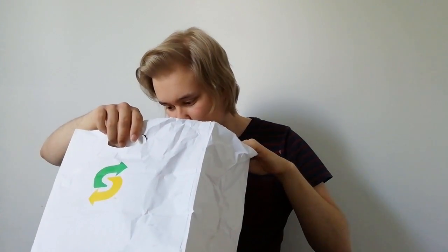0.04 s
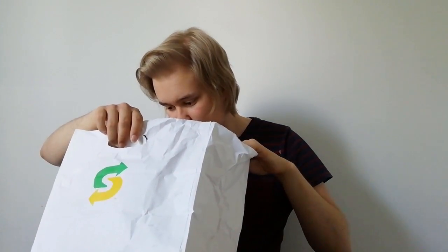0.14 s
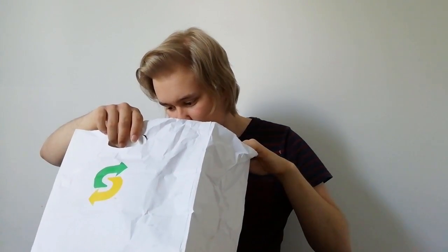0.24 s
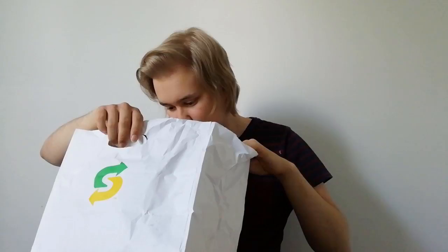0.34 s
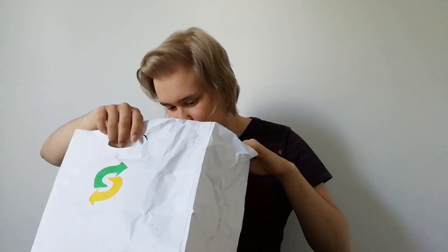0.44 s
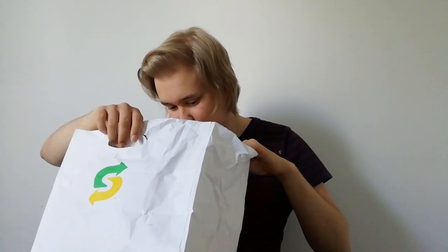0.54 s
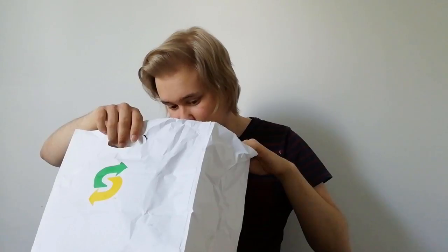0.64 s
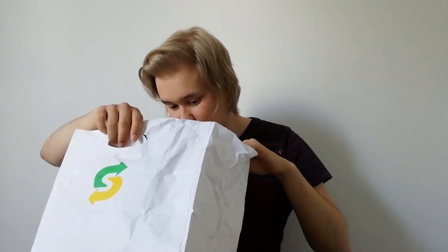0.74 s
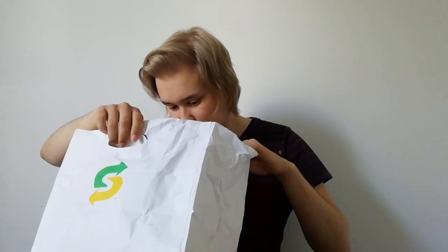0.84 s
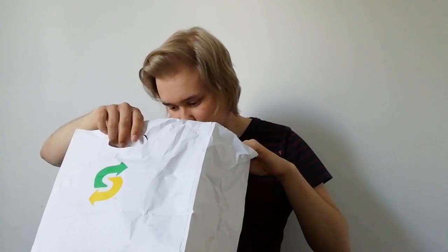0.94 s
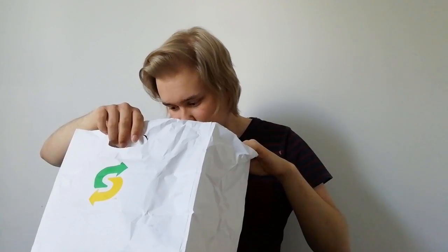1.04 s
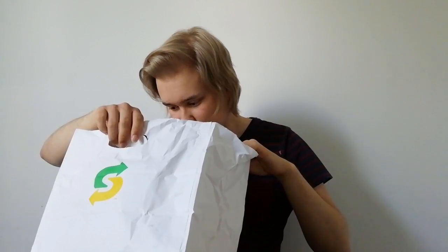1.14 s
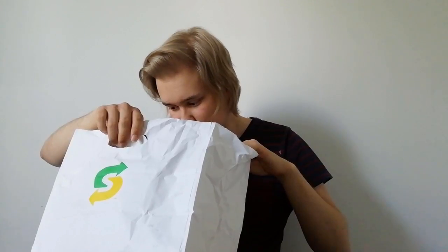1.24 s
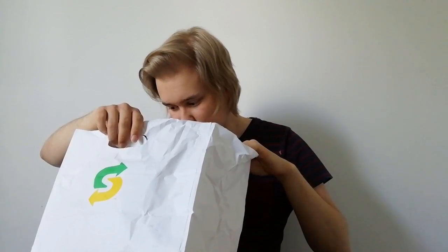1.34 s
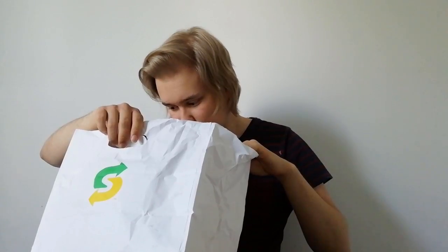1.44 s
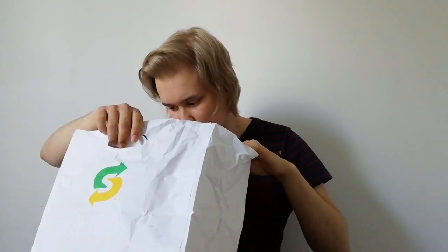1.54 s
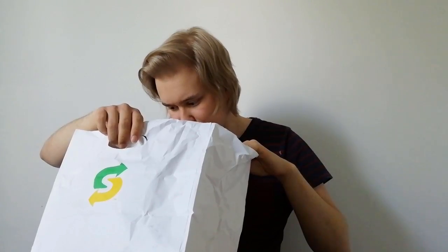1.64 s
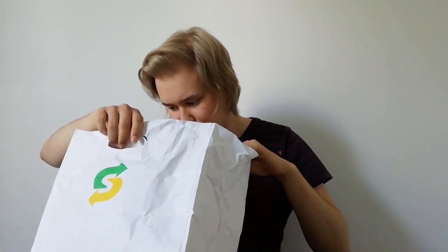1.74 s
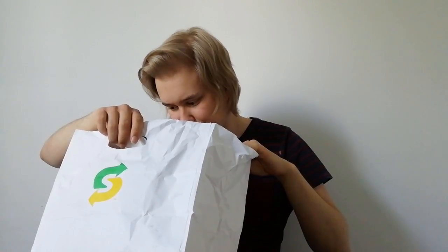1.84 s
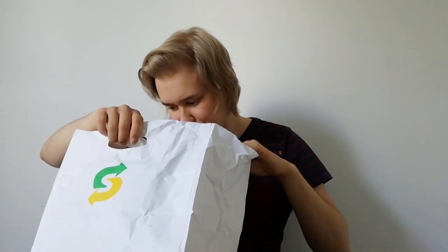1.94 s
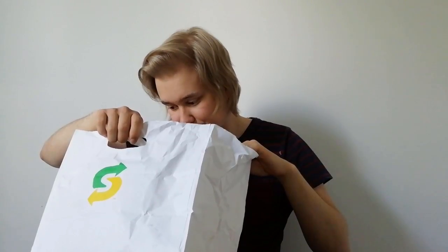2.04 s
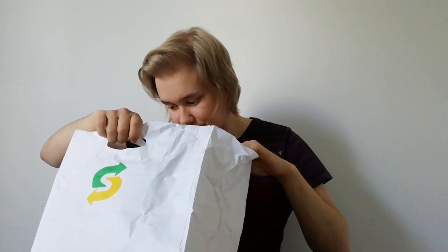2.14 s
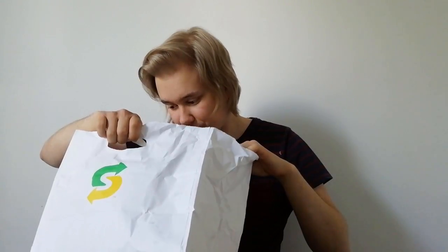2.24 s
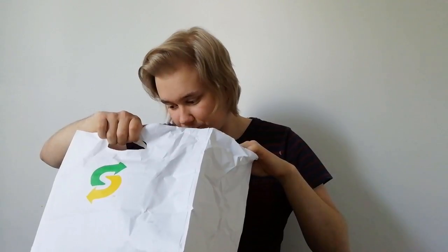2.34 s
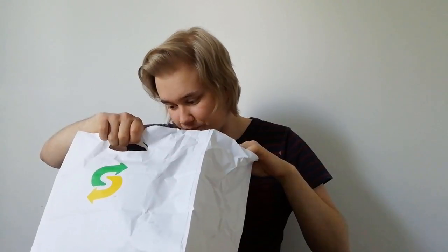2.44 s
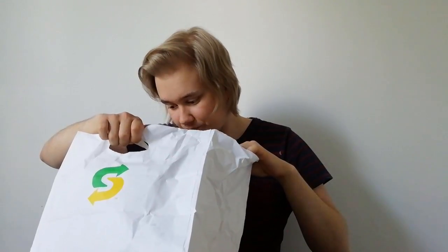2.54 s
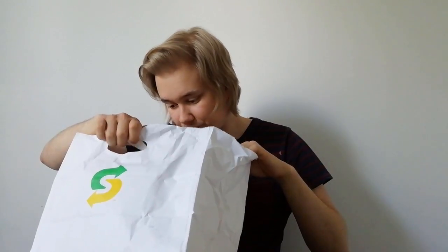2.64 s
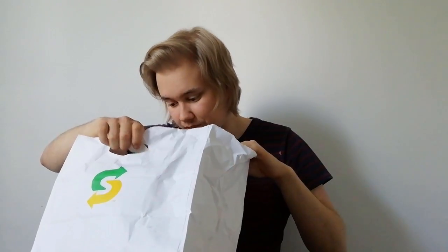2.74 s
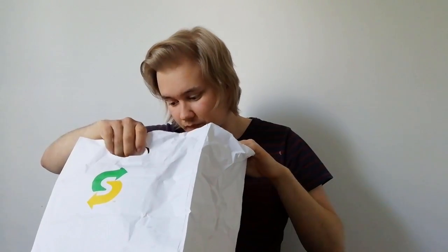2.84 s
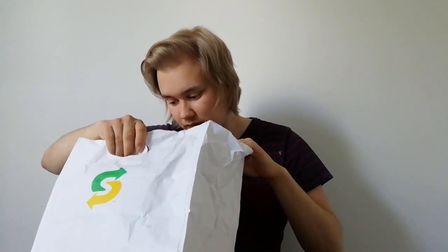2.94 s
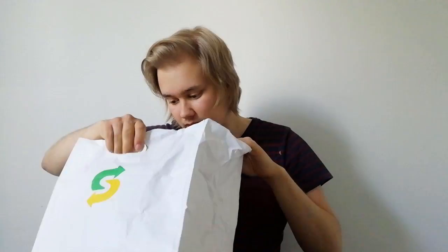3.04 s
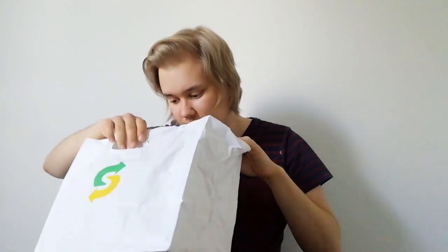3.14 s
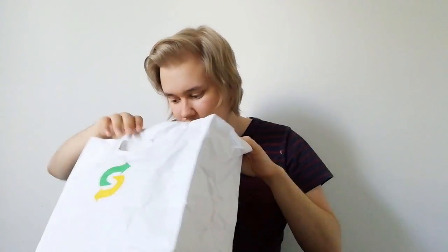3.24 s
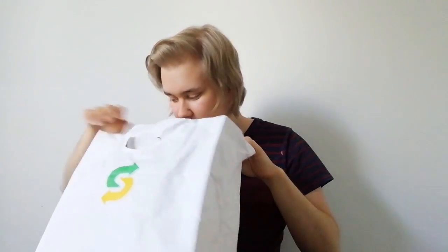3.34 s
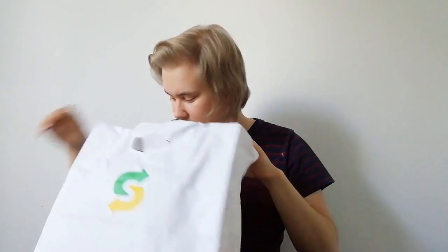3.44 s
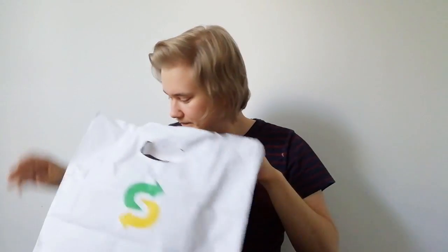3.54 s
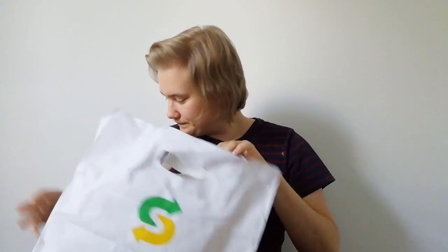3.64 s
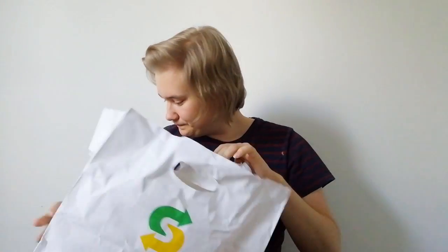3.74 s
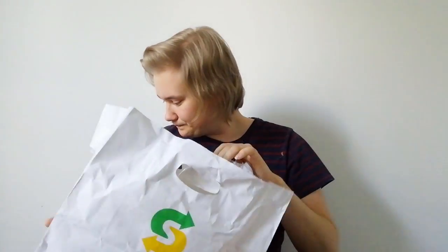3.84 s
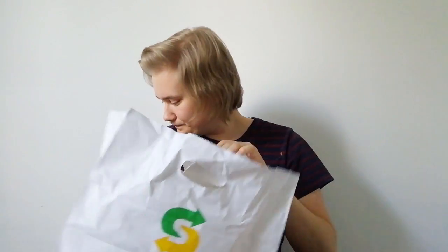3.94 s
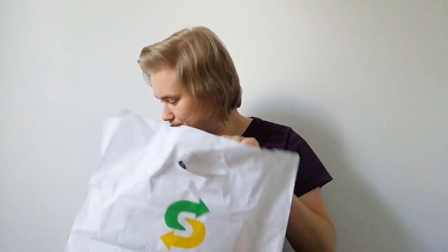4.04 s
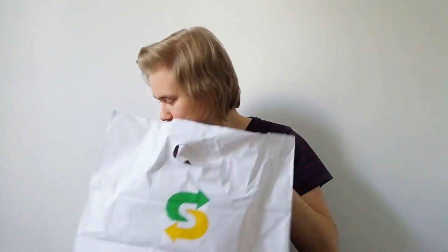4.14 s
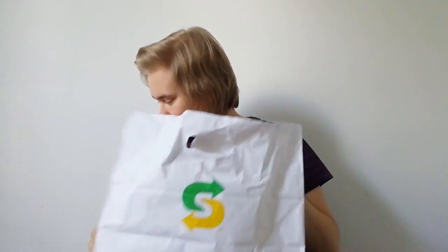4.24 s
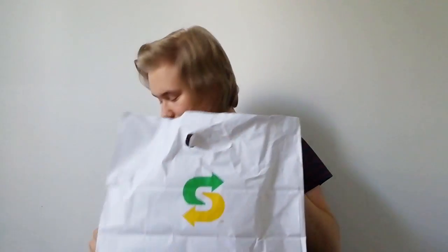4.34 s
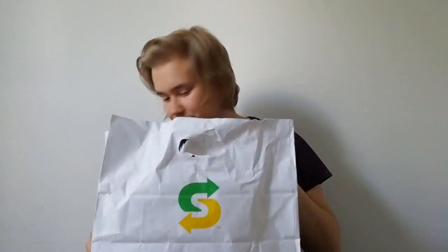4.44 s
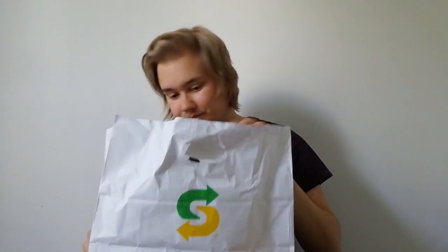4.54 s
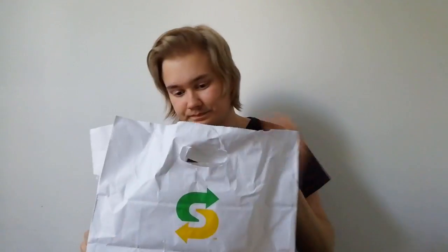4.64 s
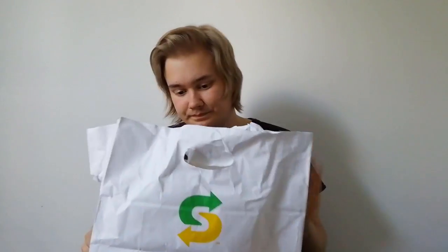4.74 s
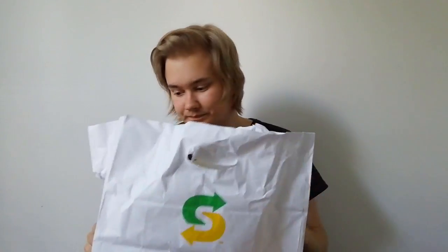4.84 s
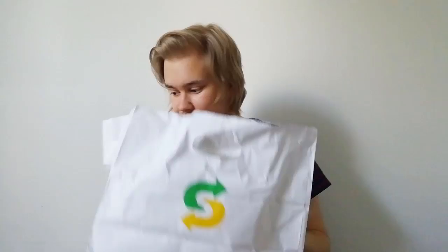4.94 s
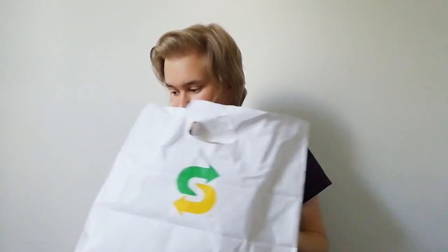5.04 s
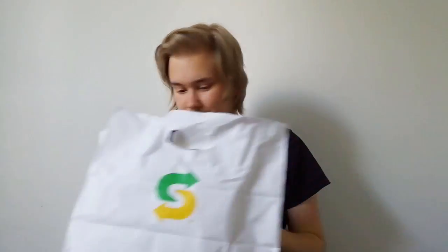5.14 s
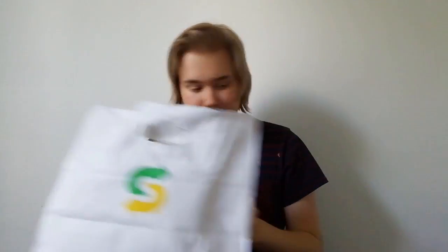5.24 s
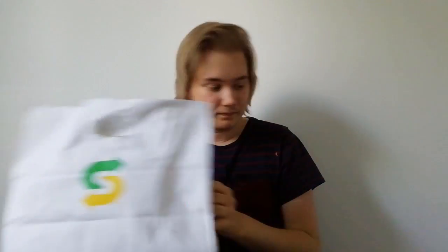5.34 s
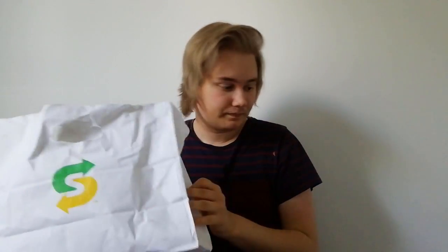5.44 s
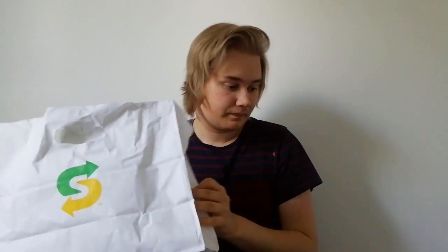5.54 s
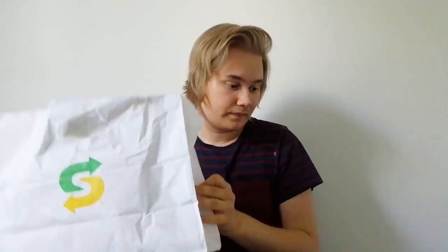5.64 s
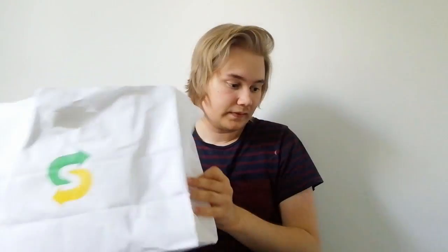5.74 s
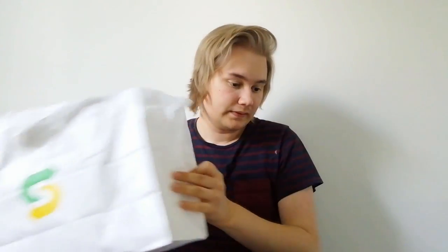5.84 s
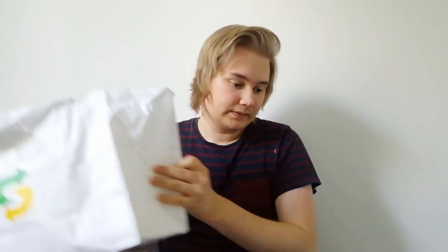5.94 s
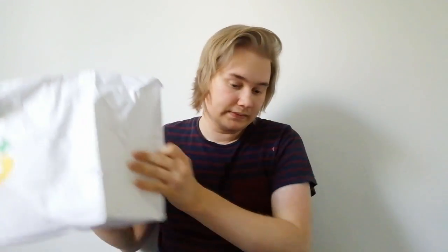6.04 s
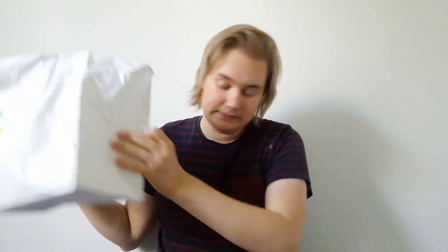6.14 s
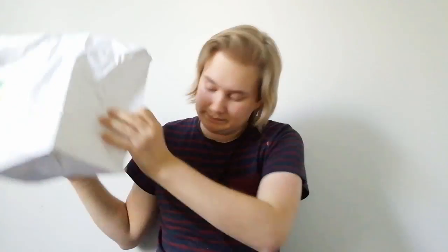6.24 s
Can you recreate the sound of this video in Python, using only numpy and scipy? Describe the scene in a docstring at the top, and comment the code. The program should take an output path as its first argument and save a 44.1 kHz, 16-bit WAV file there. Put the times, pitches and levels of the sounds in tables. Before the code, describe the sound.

Close to the microphone in a small quiet room with low rumble and faint hiss, a stiff paper bag is held almost still with tiny ticks. It suddenly pops open with a hard crackling burst and thump, rustles lightly under digging fingers, then crunches in heavier waves as it is turned and swung, loudest near five seconds, then easing off.

```python
"""A low rumble, a faint hiss and a thin hum are heard first, in a small room; they last throughout.
A stiff paper bag is held still, then gripped, opened, turned and lifted close to a microphone.
Creases are filtered noise bursts that snap and ring the facets beside them; sliding paper is dense tiny slips.
Pressed panels ring through resonators, bumped ones on decaying sines, and flipping walls thump and push air."""
import sys
import numpy as np
from scipy import signal
from scipy.fft import rfft, irfft, next_fast_len
from scipy.io import wavfile
from scipy.ndimage import uniform_filter1d

SR = 44100
rng = np.random.default_rng(int(sys.argv[2]) if len(sys.argv) > 2 else 0)


def file_out(sig):
    """Save sig as 16-bit WAV at sys.argv[1]."""
    # one column per channel
    cols = np.atleast_2d(sig).T
    # limit, then scale
    lim = np.clip(cols, -1, 1)
    pcm = np.round(lim * 32767).astype(np.int16)
    wavfile.write(sys.argv[1], SR, pcm)


N = 276771
TIME = np.arange(N) / SR
BURST = TIME[:SR // 8]  # time axis of one short event, s
SNAP_SPAN_S = 0.01  # short-event levels count all their energy as if it lay in this span
FACET_HZ = 1140  # ring of a typical facet between creases
TOP_HZ = 16000  # upper limit of the sound
GRIP_S = 1.97  # from here on the held bag never quite rests
HISS_T60_S, FLEX_T60_S = 0.24, 0.22  # releases of the sliding and flexing drives

# Colour of the paper's surface. Each row: frequency in Hz, relative level in dB per Hz.
PAPER = [(900, -1), (2400, -4.5), (3300, 5), (4600, 0), (6300, -1), (7500, 2), (8600, 0.5), (10000, -7.5),
         (13000, -11.5), (16000, -28)]
# Pushes and slides of the hands: the fingers shift, the bag is pulled open, the hand digs in,
# the bag tips over, is turned, swung aside and lifted.
# Each row: start in seconds, length in seconds, drive of the sliding hiss in dB,
# drive of the sheet's flexing in dB, ring of the pressed panel in Hz.
STROKES = [(0.517, 0.082, -66, -66.5, 880), (1.61, 0.05, -65, -71, 1200), (2.285, 0.015, -34, -23.5, 1160),
           (2.574, 0.066, -42, -45.5, 1020), (2.666, 0.041, -38.5, -46, 1560),
           (2.769, 0.054, -47, -48, 1030), (2.863, 0.2, -46, -48, 1090), (3.044, 0.14, -41, -41, 1160),
           (3.163, 0.028, -39, -34.5, 368), (3.264, 0.32, -49.5, -53, 1130),
           (3.473, 0.15, -44.5, -44.5, 1180), (3.86, 0.16, -47.5, -46, 1480),
           (3.931, 0.07, -31.5, -34, 790), (4.003, 0.12, -37.5, -37.5, 1380),
           (4.165, 0.13, -36.5, -35.5, 352), (4.334, 0.13, -43.5, -45.5, 1080),
           (4.469, 0.12, -38.5, -39, 1660), (4.613, 0.037, -40, -45, 1410),
           (4.863, 0.083, -40.5, -34.5, 410), (4.935, 0.13, -32.5, -37, 1120),
           (5.051, 0.073, -29.5, -34.5, 505), (5.139, 0.027, -24.5, -29.5, 397),
           (5.19, 0.18, -32.5, -35.5, 1230), (5.348, 0.12, -37.5, -37, 1240), (5.537, 0.058, -42, -35, 570),
           (5.65, 0.056, -49, -44, 1210), (5.717, 0.15, -42.5, -38, 1550), (5.96, 0.12, -45.5, -39.5, 1500),
           (6.194, 0.06, -54, -48.5, 1570)]


def undb(db):
    """Decibels to gain."""
    return 10 ** (np.asarray(db) / 20)


def unit(x):
    """Scale to rms 1."""
    return x / np.sqrt(np.mean(x ** 2))


def add(track, s, sound):
    """Mix a sound into a track from time s on."""
    start = int(np.clip(s * SR, 0, N - 1))
    track[start:start + len(sound)] += sound[:N - start]


def colour(x, points):
    """Filter by a spectrum of (Hz, dB) points; above the last point it falls 18 dB an octave."""
    hz, db = np.transpose(points)
    size = next_fast_len(len(x) + 4096, real=True)
    f = np.maximum(np.fft.rfftfreq(size, 1 / SR), 1)
    roll_off = np.minimum(hz[-1] / f, 1) ** 3
    gain = roll_off * undb(np.interp(np.log(f), np.log(hz), db))
    return irfft(rfft(x, size) * gain, size)[:len(x)]


def resonate(x, hz, q):
    """Two-pole band-pass, gain 1 at the centre."""
    w = 2 * np.pi * min(hz, 0.45 * SR) / SR
    a = np.sin(w) / (2 * q)
    return signal.lfilter([a, 0, -a], [1 + a, -2 * np.cos(w), 1 - a], x)


def walk(rate):
    """Smooth chance of spread near 1 that takes a new target rate times a second."""
    steps = rng.standard_normal(2048)
    return np.interp(TIME * rate, np.arange(len(steps)), steps) * np.sqrt(3 / 2)


def fade(t, t60):
    """Exponential decay by 60 dB in t60 seconds."""
    return np.exp(-np.log(1000) * t / t60)


def burst(t60, rise_s):
    """A quick run of tiny fibre breaks: noise that rises fast and dies away."""
    return rng.standard_normal(len(BURST)) * fade(BURST, t60) * (1 - np.exp(-BURST / rise_s))


def snap(ring_hz, ring_db, crack_hz, crack_db, spread=1, ring_cycles=10, ring_q=3.36,
         crack_t60=0.0099, crack_q=1.0, mode_q=9, mode_db=4):
    """A crease cracks in a few sharp partials; the facets beside it ring, longer if they are large."""
    kick = burst(ring_cycles / ring_hz, rise_s=0.00063)
    purity = max(ring_hz / (2 * FACET_HZ), 1) ** 2  # tiny taut facets ring on one narrow note
    facets = 0
    for octave in (-0.35, -0.05, 0.3):
        detune = (spread * octave + 0.13 * rng.normal()) / purity
        facets = facets + resonate(kick, ring_hz * 2 ** detune, ring_q * purity)
    ring = resonate(facets, ring_hz, q=1.85 / spread)

    crack = resonate(burst(crack_t60, rise_s=0.0014), crack_hz, crack_q)
    partials = 0
    for octave in (-0.25, 0.05, 0.5):
        detune = octave + 0.21 * rng.uniform(-1.4, 1)
        partials = partials + resonate(crack, crack_hz * 2 ** detune, mode_q)
    crack_colour = [(hz, 0.89 * db) for hz, db in PAPER]  # flatter than for sliding
    crack = colour(crack + undb(mode_db) * partials, crack_colour)
    mixed = undb(ring_db) * unit(ring) + undb(crack_db) * unit(crack)
    return mixed * np.sqrt(SNAP_SPAN_S * SR / len(BURST))


def creases():
    """Loud snaps shake facets of many sizes; dry ticks and hollow pops fall between them."""
    # Creases that crack and ring the facets beside them. Each row: start in seconds, facet ring in Hz,
    # ring level in dB over 10 ms, crack centre in Hz, crack level in dB over 10 ms.
    snaps = [(2.215, 1130, -33.5, 4130, -37.5), (2.2506, 816, -26, 3180, -23),
             (2.27, 1050, -25, 4530, -31.5), (2.292, 1130, -30, 5470, -29), (2.3053, 850, -20.5, 5370, -19),
             (2.317, 860, -22, 3300, -27), (3.989, 1700, -31.5, 4600, -29), (4.208, 1190, -23, 2960, -29.5),
             (4.2815, 2520, -27, 7300, -16.5), (4.4974, 1620, -36.5, 3360, -31.5),
             (4.5581, 1910, -29, 3000, -28), (4.563, 1890, -24, 5800, -22.5),
             (4.649, 1460, -34, 3820, -31.5), (4.789, 2060, -30.5, 4400, -30.5),
             (4.881, 455, -34, 4000, -35), (5.0676, 2080, -27, 4370, -30.5),
             (5.183, 960, -19.5, 4650, -22.5), (5.2365, 1170, -21.5, 4630, -20.5),
             (5.25, 890, -23, 2980, -31), (5.4325, 1380, -28.5, 6070, -23.5)]
    # Taut folds that tick dryly and hardly ring.
    # Each row: start in seconds, crack centre in Hz, crack level in dB over 10 ms.
    ticks = [(0.406, 3400, -62), (2.047, 7100, -46.5), (2.085, 6050, -49), (2.543, 3420, -33.5),
             (2.59, 7980, -38), (2.709, 3900, -37), (2.838, 7300, -38.5), (2.94, 4100, -36),
             (2.9994, 4430, -32.5), (3.0828, 8000, -38.5), (3.182, 4250, -38), (3.5542, 4820, -29),
             (4.021, 4560, -29), (4.187, 5480, -24), (5.151, 5860, -23.5), (5.263, 8600, -33),
             (5.6761, 6300, -38), (5.7582, 6670, -27)]
    # Facets that buckle with a hollow pop and hardly any crack.
    # Each row: start in seconds, ring in Hz, ring level in dB over 10 ms.
    pops = [(2.15, 930, -37.5), (2.803, 1040, -40.5), (2.9756, 970, -34), (2.987, 1140, -34),
            (3.074, 970, -38), (3.121, 1250, -29), (3.192, 1020, -32), (3.282, 1050, -37.5),
            (3.446, 1110, -39), (3.617, 900, -31.5), (3.6983, 1290, -30), (3.703, 636, -33),
            (3.8814, 1550, -36), (3.972, 855, -30.5), (4.124, 900, -35), (4.363, 1050, -35.5),
            (4.512, 1370, -35.5), (4.956, 1450, -22), (5.342, 1400, -28.5), (5.5546, 1170, -33),
            (5.758, 1270, -33.5), (5.817, 1590, -31), (5.845, 1330, -33.5), (5.875, 925, -28.5),
            (5.988, 1150, -28)]
    tick_ring_db = -15  # relative to the tick's crack
    pop_crack_hz, pop_crack_db = 3400, -17  # level relative to the pop's ring
    out = np.zeros(N)
    for s, *crease in snaps:
        add(out, s, snap(*crease, spread=1.67))
    for s, hz, db in ticks:
        add(out, s, snap(FACET_HZ, db + tick_ring_db, hz, db, crack_q=0.84))
    for s, hz, db in pops:
        pop = snap(hz, db, pop_crack_hz, db + pop_crack_db, spread=0.84, ring_cycles=14.4)
        add(out, s, pop)
    return out


def crinkles(hiss_db, flex_db, count=480, ring_db=-7, crack_db=-7.5, scatter_db=3):
    """Small creases give way at random, as strongly as the bag is worked."""
    out = np.zeros(N)
    for s in rng.uniform(GRIP_S, TIME[-1], count):
        i = int(s * SR)
        facet, edge, ring_luck, crack_luck = np.clip(rng.normal(size=4), -2, 2)
        ring_level = flex_db[i] + ring_db + scatter_db * ring_luck
        crack_level = hiss_db[i] + crack_db + scatter_db * crack_luck
        sound = snap(FACET_HZ * 2 ** (0.5 * facet), ring_level, 5200 * 2 ** (0.42 * edge), crack_level)
        add(out, s, sound)
    return out


def stroke(length, release_t60):
    """One push of the hand builds up, holds, then dies away."""
    attack_s = 0.021
    t = TIME[:SR]
    return np.clip(t / attack_s, 0, 1) * fade(np.maximum(t - length, 0), release_t60)


def effort(rest_db, release_t60, peaks_db):
    """Gain over time: the powers of the strokes add up over the light steady grip."""
    grip_rise_s = 0.26
    power = (undb(rest_db) * np.clip((TIME - GRIP_S) / grip_rise_s, 0, 1)) ** 2
    for (start, length, *_), db in zip(STROKES, peaks_db):
        add(power, start, (undb(db) * stroke(length, release_t60)) ** 2)
    return np.sqrt(power)


def slips(rate, spread_db):
    """Dense tiny stick-slip clicks, rate per second, most small and a few large."""
    size = undb(spread_db * np.minimum(rng.exponential(size=N), 5))
    struck = rng.random(N) < rate / SR
    return unit(rng.standard_normal(N) * size * struck)


def shifting(x, flicker_db, flicker_rate, q):
    """The bending sheet's resonances come and go, each on its own."""
    centres = np.geomspace(150, 14000, 28)
    return sum(resonate(x, hz, q) * undb(flicker_db * walk(flicker_rate)) for hz in centres)


def rustle(hiss_db, flex_db):
    """Sliding paper hisses, brighter as it slides faster; the flexing sheet adds a hollow, uneven body."""
    # Colour of the bending sheet. Each row: frequency in Hz, relative level in dB per Hz.
    sheet = [(100, -0.5), (380, 4.5), (560, -1.5), (1650, -5), (2300, -12.5), (5000, -31)]
    friction = shifting(slips(rate=5000, spread_db=1.0), flicker_db=3.0, flicker_rate=22, q=3.8)
    hiss = colour(friction, PAPER)
    speed = undb(0.17 * (hiss_db - np.median(hiss_db[TIME > GRIP_S])))
    sheen = colour(hiss, [(3500, -30), (10000, 0), (TOP_HZ, 0)])
    hiss = unit(hiss + (speed - 1) * sheen)
    bending = shifting(slips(rate=2000, spread_db=2.5), flicker_db=3.0, flicker_rate=24, q=7.8)
    body = unit(colour(bending, sheet))
    grip = undb(2.04 * walk(rate=60))  # the fingers catch and let go
    return grip * (undb(hiss_db - 1.5) * hiss + undb(flex_db - 3.5) * body)


def panels():
    """Each stroke drags over one panel of the bag, and the coarse slips ring its two modes."""
    panel_db, panel_q = -6.5, 4.6  # level of the lower mode, relative to the flexing drive
    overtone, overtone_db = 2.01, -6  # second mode: frequency ratio, relative level
    out = np.zeros(N)
    drag = slips(rate=1500, spread_db=1.5)
    for start, length, _, db, hz in STROKES:
        push = np.roll(drag, -int(start * SR))[:SR]
        low = unit(resonate(resonate(push, hz, panel_q), hz, q=1.17))
        high_hz = overtone * hz
        high = unit(resonate(resonate(push, high_hz, panel_q), high_hz, q=1.17))
        ring = low + undb(overtone_db) * high
        add(out, start, undb(db + panel_db) * ring * stroke(length, FLEX_T60_S))
    return out


def knocks(sag=0.032, rough=0.44, rise_s=0.00074):
    """A bumped panel rings on loose modes and drops in pitch as it relaxes; higher modes die sooner."""
    # Broad panels that ring a low hollow note. Each row: start in seconds, settled pitch in Hz,
    # gain in dB ahead of the mode levels, t60 of the lowest mode in seconds.
    bumps = [(1.498, 254, -43.5, 0.053), (2.303, 240, -17, .04), (2.312, 390, -19, .06),
             (3.634, 415.6, -25, 0.078), (3.968, 401, -28.5, .12), (4.23, 544, -26.5, 0.057),
             (4.263, 373, -18.5, 0.047), (5.531, 395, -26.5, 0.043)]
    # Modes of a bumped panel. Each row: frequency ratio, relative level in dB.
    modes = [(1, -3), (1.5, -12), (2.85, -10.5)]
    out = np.zeros(N)
    for s, hz, db, t60 in bumps:
        phase = 2 * np.pi * np.cumsum(hz * (1 + sag * fade(BURST, t60))) / SR
        ring = 0
        for ratio, mode_db in modes:
            ring = ring + undb(mode_db) * np.sin(ratio * phase) * fade(BURST, t60 / np.sqrt(ratio))
        rattle = 1 + rough * unit(resonate(rng.standard_normal(len(BURST)), hz / 2, 0.95))
        add(out, s, undb(db) * ring * rattle * (1 - np.exp(-BURST / rise_s)))
    return out


def click(q=6):
    """A fingernail ticks tightly on two narrow modes while the bag is still held."""
    # Modes of the click. Each row: frequency in Hz, level in dB over 10 ms.
    modes = [(4350, -50), (7600, -51)]
    start_s, t60_s = 1.403, 0.0052
    out = np.zeros(N)
    for hz, db in modes:
        ring = resonate(resonate(burst(t60_s, rise_s=0.00039), hz, q), hz, q)
        add(out, start_s, undb(db) * unit(ring) * np.sqrt(SNAP_SPAN_S * SR / len(BURST)))
    return out


def wall_air(flex, flutter_db=0, flutter_ratio=2.55):
    """Slow gusts from the swaying bag; a wall that flips thumps, and its smaller panels flutter."""
    # Colour of the moving air. Each row: frequency in Hz, relative level in dB per Hz.
    air = [(35, -0.5), (100, -9), (260, -25)]
    # Whole walls that flip over. Each row: start in seconds, pitch of the thump in Hz,
    # gain of thump and flutter in dB, t60 of the thump in seconds.
    flaps = [(1.081, 110, -44, 0.03), (2.305, 96, -11.5, 0.065), (3.712, 90, -27.5, 0.1),
             (4.122, 87, -21.5, 0.085), (4.244, 97.4, -20, 0.14), (4.283, 93.3, -14, 0.12),
             (5.174, 89.5, -8.5, 0.042)]
    air_db, lag_s, smooth_s = 2, 0.034, 0.17  # the walls follow the flexing sluggishly
    flutter_t60_s = 0.061  # added damping of the smaller panels
    sway = np.interp(TIME - lag_s, TIME, uniform_filter1d(flex, int(smooth_s * SR)))
    out = unit(colour(rng.standard_normal(N), air)) * undb(air_db) * sway
    for s, hz, db, t60 in flaps:
        panels_hz = flutter_ratio * hz
        flutter = resonate(rng.standard_normal(len(BURST)), panels_hz, 0.95)
        flutter = resonate(flutter, panels_hz, 0.95)
        flutter = undb(flutter_db) * flutter / np.abs(flutter).max()
        flutter = flutter * fade(BURST, t60) * fade(BURST, flutter_t60_s)
        thump = np.sin(2 * np.pi * hz * BURST) * fade(BURST, t60)
        add(out, s, undb(db) * (thump + flutter))
    return out


def room(x, t60=0.37, wet_db=-10.0, early_t60=0.043, early_db=-12, gap_s=0.0043):
    """Quick echoes off the bag, body and near wall, then a short tail whose treble dies first."""
    # Colour of the room's answer. Each row: frequency in Hz, gain in dB.
    walls = [(60, 3), (400, -3.5), (16000, -2.5)]
    t = TIME[:SR // 2]
    early, late = rng.standard_normal((2, len(t)))
    early = early * (rng.random(len(t)) < 0.04)  # sparse echoes
    dull = colour(late, [(1, 0), (4500, 0)])
    late = dull + (late - dull) * fade(t, t60)  # extra decay for the treble
    echoes = undb(early_db) * unit(early * fade(t, early_t60))
    tail = undb(wet_db) * unit(late * fade(t, t60))
    answer = colour(echoes + tail, walls) / np.sqrt(len(t))
    answer = np.pad(answer, (int(gap_s * SR), 0))
    return x + signal.fftconvolve(x, answer)[:N]


def background():
    """Low rumble and faint hiss are coloured noise; the hum of an appliance is a slightly unsteady sine."""
    # Colour of the quiet room. Each row: frequency in Hz, relative level in dB per Hz.
    room_tone = [(20, -1), (60, -7.5), (450, -34), (1200, -33), (2300, -41), (8000, -43.5), (16000, -54.5)]
    tone_db, hum_hz, hum_db = -53.5, 697, -76  # rms levels
    tone = unit(colour(rng.standard_normal(N), room_tone))
    hum_phase = 2 * np.pi * np.cumsum(hum_hz + 0.89 * walk(rate=45)) / SR
    hum = np.sqrt(2) * np.sin(hum_phase)
    return undb(tone_db) * tone + undb(hum_db) * hum


def scene():
    """The bag in its room: the strokes drive hiss, flexing, small crinkles and moving air."""
    grip_hiss_db, grip_flex_db = -54.5, -53.5  # drives of the steady grip
    _, _, hiss_peaks, flex_peaks, _ = np.transpose(STROKES)
    slide = effort(grip_hiss_db, HISS_T60_S, hiss_peaks)
    flex = effort(grip_flex_db, FLEX_T60_S, flex_peaks)
    hiss_db, flex_db = 20 * np.log10(np.maximum([slide, flex], 1e-6))
    paper = creases() + crinkles(hiss_db, flex_db) + rustle(hiss_db, flex_db) + panels()
    paper = paper + knocks() + knocks()  # two layers, each with its own rattle
    return (room(paper) + click() + wall_air(flex) + background())[None]


def record(dry):
    """Peaks clip hard at full scale, then a steep low-pass cuts the top."""
    full_scale = 0.8
    low_pass = signal.ellip(8, 0.2, 70, TOP_HZ, fs=SR, output="sos")
    return signal.sosfilt(low_pass, np.clip(dry, -full_scale, full_scale))


dry = scene()
out = record(dry)
file_out(out)
```